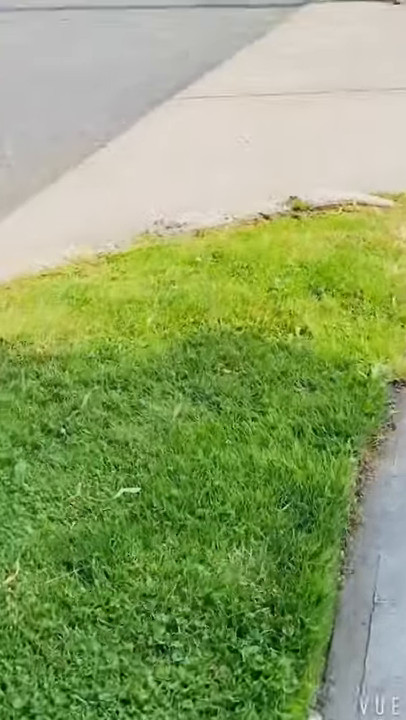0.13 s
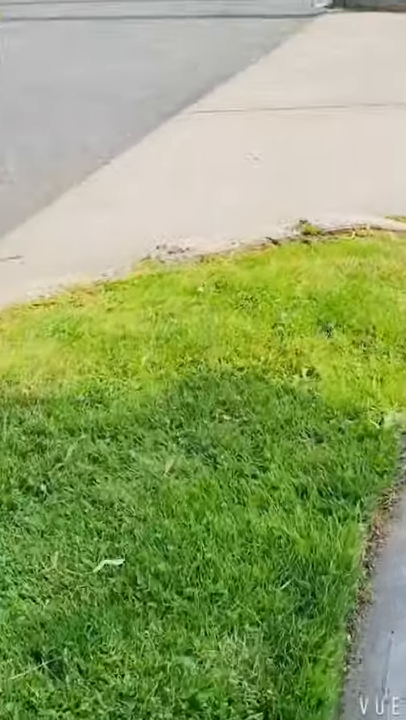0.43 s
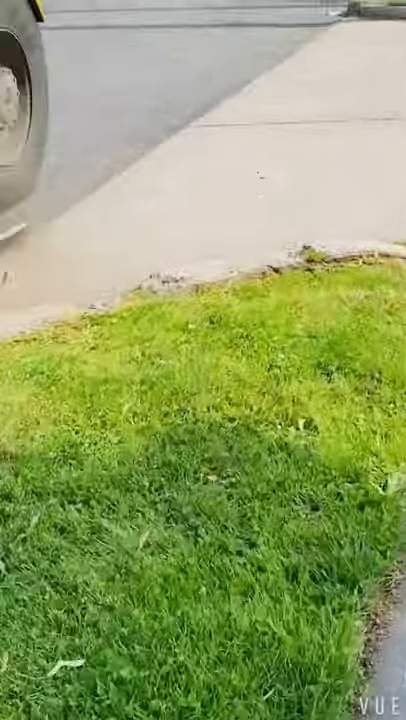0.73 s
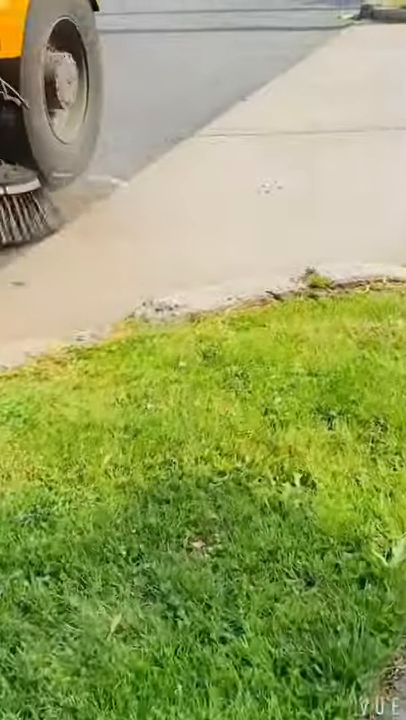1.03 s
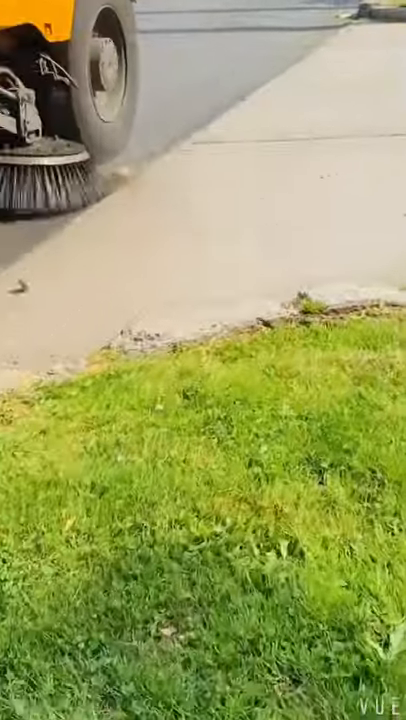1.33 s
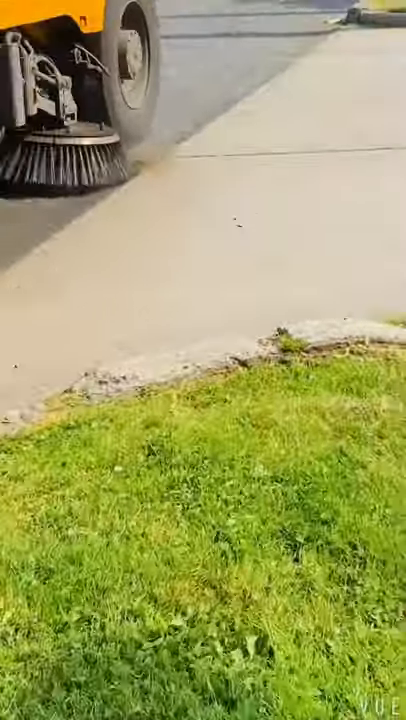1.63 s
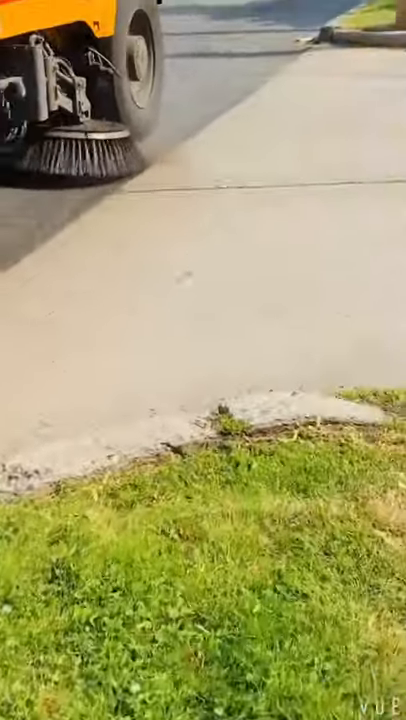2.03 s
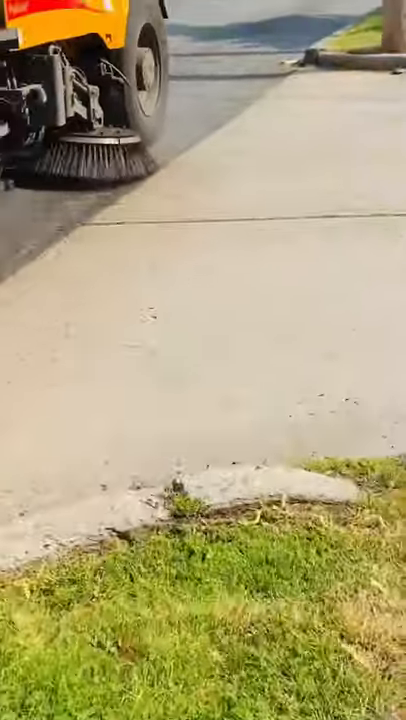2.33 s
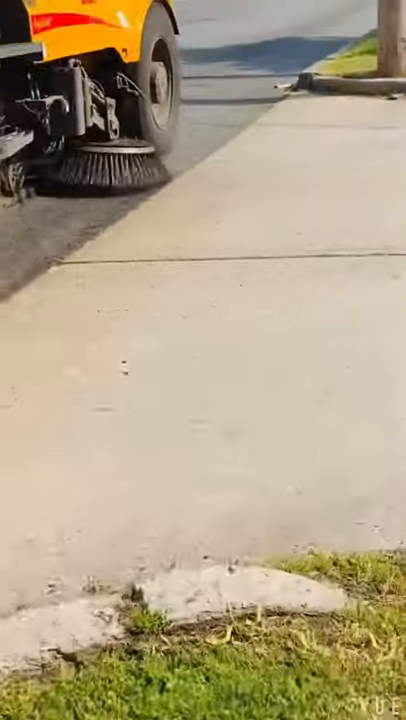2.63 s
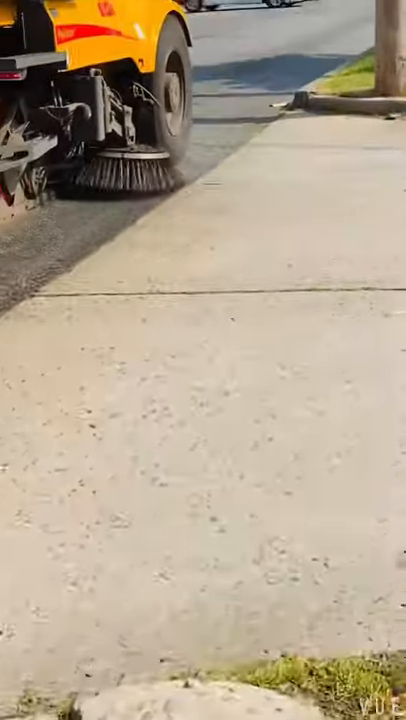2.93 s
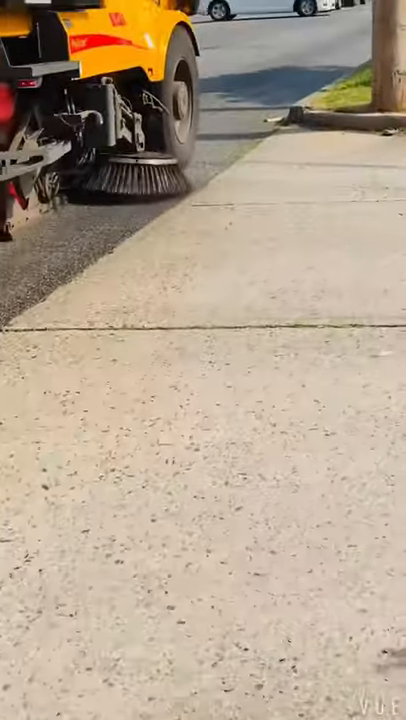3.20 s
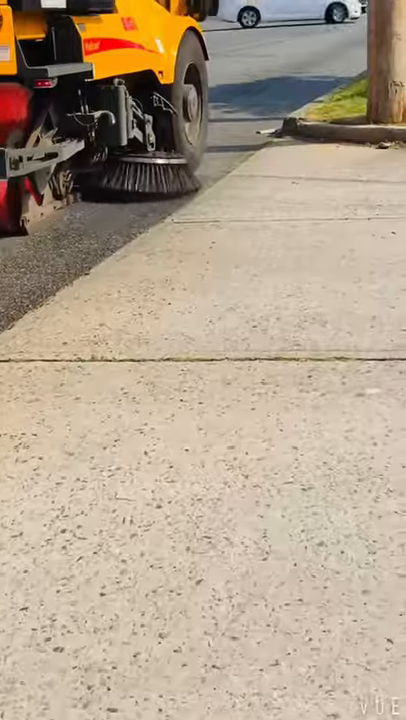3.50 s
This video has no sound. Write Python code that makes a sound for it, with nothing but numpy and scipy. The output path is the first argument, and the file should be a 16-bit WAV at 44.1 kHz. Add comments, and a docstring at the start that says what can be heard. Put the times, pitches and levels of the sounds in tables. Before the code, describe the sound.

A street sweeper crawls past close by, its diesel engine droning under a rushing suction fan and a wavering hydraulic whine. Its wire brush hisses on the road throughout, loudest from about 0.6 to 1.5 seconds, then easing slightly. Brief harder scrapes come in the first 0.7 seconds and near 2.4 and 3.1 seconds. Small stones ping off the wires at about 2.1 and 2.4 seconds.

```python
"""At the kerb, a street sweeper crawls past a close pair of microphones.
Its diesel drones at a steady speed under the roar of the suction fan, and hydraulic drives whine
unsteadily. Up front, the wire gutter brush hisses over the road, loudest as it passes.
Now and then the wires scrape harder, and grit pings off them."""
import sys
import numpy as np
from scipy import signal
from scipy.fft import rfft, irfft, next_fast_len
from scipy.io import wavfile
from scipy.ndimage import uniform_filter1d, map_coordinates

SR = 44100
rng = np.random.default_rng(int(sys.argv[2]) if len(sys.argv) > 2 else 0)


def inscribe(sig):
    """Save sig as 16-bit PCM at rate SR to the path in sys.argv[1].

    A 1-D sig is mono; a 2-D sig holds one channel per row.
    Samples are clipped to [-1, 1] before scaling.
    """
    pcm = np.round(np.clip(np.atleast_2d(sig).T, -1, 1) * 32767)
    wavfile.write(sys.argv[1], SR, pcm.astype(np.int16))


N = 161406

FIRING_HZ, SPEED_WANDER = 62.97, 0.0018  # the diesel's firing rate and its relative drift
# stereo image of the microphones: (frequency [Hz], coherence, left lead [rad], left over right [dB])
MIC_PAIR = [(60, 1, 0, .2), (130, 1, 0, 1.5), (400, .99, 0, 3.1), (650, .86, .8, 7.4),
            (800, .15, -.5, 10.3), (1100, .84, -1.1, 6.9), (1550, .88, -.45, 4.5), (1950, .78, 0, 2.3),
            (2400, .3, -.2, -.8), (2650, .45, 2.2, -2.9), (3200, .7, 2, 1), (3500, .4, 3.3, 3.1),
            (3850, .78, 5.9, -.7), (4350, .98, 6.3, 0), (5000, .53, 7, .6), (6500, .57, 8.6, -.5),
            (7200, .85, 9.3, 0), (7900, 1, 3 * np.pi, 0), (11100, 1, 3 * np.pi, 0), (12400, .72, 9.8, 0),
            (15500, .55, 11.9, 0)]


def amp(db):
    """Decibels to gain."""
    return 10 ** (np.asarray(db) / 20)


def unit(x):
    """Scale to rms 1."""
    return x / np.sqrt(np.mean(x ** 2) + 1e-20)


def along(points, hz, column=1):
    """One column of a table, read on a log frequency axis."""
    columns = np.transpose(points)
    return np.interp(np.log(hz + 1), np.log(columns[0] + 1), columns[column])


def curves(rows):
    """Automation: one value per sample for each column after the time."""
    times, *columns = np.transpose(rows)
    return [np.interp(np.arange(N) / SR, times, column) for column in columns]


def wobble(rate):
    """A smooth random curve, rate knots a second."""
    return map_coordinates(rng.standard_normal(1024), [np.arange(N) * rate / SR], mode="wrap")


def filtered(x, response):
    """Filter x by a complex response of frequency."""
    size = next_fast_len(N + SR // 2)
    return irfft(rfft(x, size) * response(np.fft.rfftfreq(size, 1 / SR)), size)[..., :N]


def spread(pair, spectrum):
    """EQ two unrelated signals, add the wires' ring and mix to partly coherent stereo of rms 1."""
    # resonances of the brush wires and their mount: (centre [Hz], half width [Hz], lift [dB])
    rings = [(2840, 6.7, 7), (3160, 36, 7.5), (4130, 60, 4.5)]

    def mid_side_eq(hz):
        width = np.arccos(np.clip(along(MIC_PAIR, hz), 0, 1)) / 2
        ring_db = sum(lift / (1 + ((hz - centre) / half) ** 2) for centre, half, lift in rings)
        return amp(along(spectrum, hz) + ring_db) * [np.cos(width), np.sin(width)]
    mid, side = filtered(pair, mid_side_eq)
    return unit(np.array([mid + side, mid - side]))


def rush(spectrum, patchy_db):
    """Stereo noise of rms 1, mottled with random gain across pitch and time."""
    bins = signal.stft(rng.standard_normal((2, N)), nperseg=512)[2]
    patches = uniform_filter1d(rng.standard_normal(bins.shape[1:]), size=6, axis=0)
    patches = uniform_filter1d(patches, size=12, axis=1)
    noise = signal.istft(bins * amp(patchy_db * unit(patches)), nperseg=512)[1]
    return spread(noise[:, :N], spectrum)


def cycle(hz):
    """Running phase of a rotation, from a random start."""
    return 2 * np.pi * (np.cumsum(hz) / SR + rng.random())


def tone(phase, level_db, flutter_db, smear_rad):
    """A sine whose level and phase flutter."""
    return np.sqrt(2) * amp(level_db + flutter_db * wobble(17)) * np.sin(phase + smear_rad * wobble(22))


def roughness(depth):
    """A fast random gain of rms 1 that frays a tone."""
    return unit(1 + depth * wobble(70))


def engine(crank):
    """Exhaust and block harmonics shift in balance as the diesel goes by, and the exhaust booms."""
    # engine harmonics: (multiple of crank rate, level ahead [dB], alongside [dB], from behind [dB])
    orders = [(2, -40, -36, -34.6), (6, -31, -38, -44.5), (7, -41, -43, -49), (10, -42.5, -43, -41.5),
              (12, -50.5, -41.5, -45), (14, -55, -64, -46.5), (20, -36.5, -51, -69),
              (21, -47.5, -64, -61.5), (27, -46, -56.5, -64), (30, -49.5, -48, -52.5), (34, -43, -42, -47)]
    # stages of the pass: (ahead until [s], alongside from [s], alongside until [s], behind from [s])
    pass_times = [0.201, 0.851, 1.25, 1.75]
    # exhaust boom: (time [s], level [dB])
    boom = [(0, -36.5), (.55, -30), (1.2, -31.5), (1.85, -37), (2.3, -35.5), (2.8, -35.5), (3.5, -32.7)]
    t = np.arange(N) / SR
    harmonics = [(order, np.interp(t, pass_times, [ahead, beside, beside, behind]))
                 for order, ahead, beside, behind in orders]
    harmonics.append((4, curves(boom)[0]))  # twice the firing rate
    return sum(tone(order * crank + 2 * np.pi * rng.random(), db, flutter_db=0.45, smear_rad=0.06)
               for order, db in harmonics)


def fan(pitch_hz=282.8):
    """The fan drones on one rough note that swells and fades."""
    # fan drone: (time [s], level [dB])
    drone = [(0, -31.5), (.33, -24), (.7, -34.5), (1.1, -34), (1.55, -51), (2.05, -39), (2.4, -61),
             (2.9, -41.5), (3.66, -41)]
    db, = curves(drone)
    return roughness(0.17) * tone(cycle(np.full(N, pitch_hz)), db, flutter_db=1.5, smear_rad=0.15)


def hydraulics():
    """Two hydraulic drives glide with their load, rattling a little."""
    # hydraulic moan: (time [s], pitch [Hz], level [dB])
    moan_glide = [(0, 338, -44), (.38, 355, -31), (.47, 363, -33.5), (.58, 369, -25.5), (.73, 371, -31.5),
                  (.82, 375, -29), (.89, 380, -31.5), (.97, 385, -25.5), (1.1, 377, -33), (1.47, 345, -52),
                  (1.64, 318, -36), (1.85, 325, -42), (2.02, 329, -31), (2.14, 327, -29.5),
                  (2.32, 321, -41), (3.66, 320, -54)]
    # brush motor's whine: (time [s], pitch [Hz], level [dB])
    whine_glide = [(0, 526.4, -39.5), (.9, 490, -56), (1.3, 499.4, -41), (1.55, 552, -47),
                   (2.15, 535, -47.5), (2.52, 540.6, -40.5), (3, 523, -41), (3.45, 547, -45),
                   (3.66, 546, -46)]
    moan_hz, moan_db = curves(moan_glide)
    whine_hz, whine_db = curves(whine_glide)
    moan = roughness(0.22) * tone(cycle(moan_hz), moan_db, flutter_db=-1.5, smear_rad=0.4)
    whine = roughness(0.3) * tone(cycle(whine_hz), whine_db, flutter_db=2, smear_rad=0.24)
    return moan + whine


def suction(crank):
    """Rushing air over a bed of rumble and growl, all throbbing a little with the firings."""
    # machine rumble: (frequency [Hz], gain [dB])
    rumble_eq = [(20, -53.5), (35, -24), (50, -4), (80, 1.5), (110, 2.5), (170, 6), (250, 0), (350, 3.5),
                 (450, 0), (600, -7.5), (1300, -44.5)]
    # engine bay growl: (time [s], level [dB])
    growl_level = [(0, -31.5), (.15, -27), (.35, -29.5), (.7, -26.5), (1.05, -36.5), (1.5, -49), (2, -38.5),
                   (3.66, -43.5)]
    # its colour: (frequency [Hz], gain [dB])
    growl_eq = [(60, -22), (120, -8.5), (190, 0), (280, -1.5), (370, 7), (460, -6), (650, -4.5),
                (800, -8.5), (1100, -35.5), (2000, -12.5), (3000, -43.5), (6000, -59)]
    # suction air: (time [s], level [dB])
    air_level = [(0, -31), (.6, -33), (.95, -31), (1.55, -30.5), (1.85, -33), (2.35, -33), (3, -33),
                 (3.66, -33)]
    # its colour: (frequency [Hz], gain [dB])
    air_eq = [(300, -8.5), (600, -13), (830, 0), (980, 1), (1080, 4), (1220, 2.5), (1420, 1.5),
              (1650, -2.5), (2100, -5.5), (3000, -13.5), (6000, -26), (16000, -47)]
    growl_db, = curves(growl_level)
    air_db, = curves(air_level)
    throb = np.sin(2 * crank)
    flutter_db = 0.55 * np.sin(cycle(hz=11.2 + 0.67 * wobble(3)))
    rumble = amp(-33) * rush(rumble_eq, patchy_db=1.1)
    growl = amp(growl_db) * rush(growl_eq, patchy_db=0.7)
    air = amp(air_db + 0.31 * throb + flutter_db) * rush(air_eq, patchy_db=1.43)
    return amp(0.29 * throb) * (rumble + growl) + air


def grit(t60_s=0.063):
    """Small stones strike the wires, each with one short ping."""
    # stone hits: (time [s], level [dB], pitch [Hz])
    pings = [(2.109, -17, 3655), (2.435, -17.5, 3300)]
    t, out = np.arange(N) / SR, np.zeros(N)
    for start, db, hz in pings:
        age = np.maximum(t - start, 0)
        attack = 1 - np.exp(-0.5 * hz * age)
        out += amp(db - 60 * age / t60_s) * attack * np.sin(2 * np.pi * hz * age)
    return out * np.array([[1], [0.5]])  # panned left


def scrapes(half_width_octaves=0.53, sag_hz_per_s=16000):
    """The wires bite harder for a moment, each time with a rasp that slides down in pitch."""
    # hard scrapes: (peak time [s], half length [s], level [dB], centre [Hz])
    bites = [(0.262, 0.02, -31.5, 2100), (0.442, 0.009, -27, 3700), (0.634, 0.012, -29, 3700),
             (2.442, 0.014, -33, 2800), (3.088, .028, -26, 3750)]
    t, out = np.arange(N) / SR, np.zeros((2, N))
    for peak_s, half_s, db, centre_hz in bites:
        band = [(centre_hz * 2 ** (k * half_width_octaves), -6 * k * k) for k in range(-3, 4)]
        envelope = amp(db + 1.2 * wobble(250)) * np.exp(-0.5 * ((t - peak_s) / half_s) ** 2)
        rasp = spread(rng.standard_normal((2, N)), band)
        analytic = signal.hilbert(rasp, next_fast_len(N))[:, :N]
        down_sweep = np.exp(-1j * np.pi * sag_hz_per_s * (t - peak_s) ** 2)
        out += envelope * np.real(analytic * down_sweep)
    return out


def brush(flicks_per_s=900):
    """Wires drag over the road: a ringing hiss, a fine sizzle and single flicks of bristle."""
    # brush on the road: (time [s], level [dB])
    contact_level = [(0, -32.5), (.15, -25.5), (.28, -23.5), (.38, -26.5), (.65, -22.5), (1.45, -22.5),
                     (1.98, -25.5), (2.35, -25), (2.65, -26), (3, -26.5), (3.25, -29), (3.66, -28)]
    # colour of hiss and flicks: (frequency [Hz], gain [dB])
    wire_eq = [(800, -6), (2000, -8.5), (2650, 4.5), (3100, -0.5), (3550, 1.5), (4000, 1.5), (4700, 2.5),
               (5400, -3.5), (6600, -4), (8000, -27.5), (12000, -42.5), (16000, -22)]
    # sizzle of the wire tips: (frequency [Hz], gain [dB])
    sizzle_eq = [(3000, -30), (6000, -11), (7600, -6.5), (12000, -2), (13800, 0), (16000, -3.8)]
    contact_db = curves(contact_level)[0] + 0.35 * wobble(23)
    hiss = rush(wire_eq, patchy_db=0.5)
    sizzle = rush(sizzle_eq, patchy_db=0.5)
    clicks = (rng.random((2, N)) < flicks_per_s / SR) * rng.standard_normal((2, N))
    flicks = spread(clicks, wire_eq)
    hiss_db = -5.5 + 1.17 * wobble(70)
    return amp(contact_db) * (amp(hiss_db) * hiss + amp(-5) * sizzle + amp(-19) * flicks)


def scene():
    """The whole sweeper, throbbing with two firings to each turn of the crank."""
    crank = cycle(FIRING_HZ / 2 * (1 + SPEED_WANDER * wobble(3.03)))
    return engine(crank) + fan() + hydraulics() + suction(crank) + brush() + scrapes() + grit()


def record(dry):
    """The two microphones hear each frequency at their own level and phase; the very top is cut."""
    def mic_response(hz):
        sides = np.array([[0.5], [-0.5]])
        gain = amp(sides * along(MIC_PAIR, hz, column=3))
        phase = sides * along(MIC_PAIR, hz, column=2)
        return gain / np.sqrt(np.mean(gain ** 2, axis=0)) * np.exp(1j * phase)
    return filtered(filtered(dry, mic_response), lambda hz: hz < 15950)


dry = scene()
out = record(dry)
inscribe(out)
```